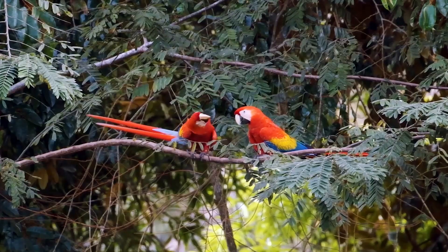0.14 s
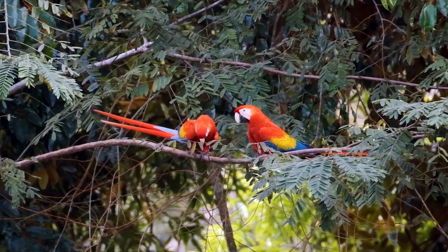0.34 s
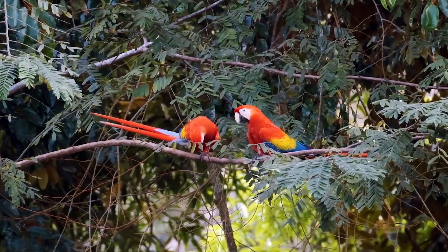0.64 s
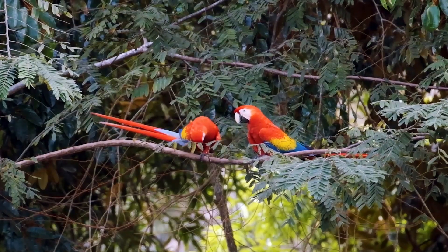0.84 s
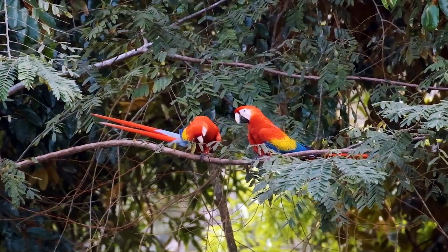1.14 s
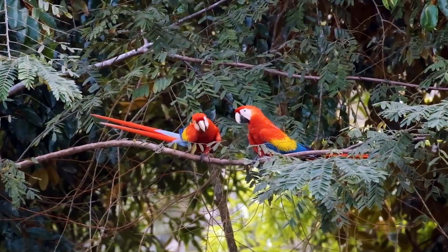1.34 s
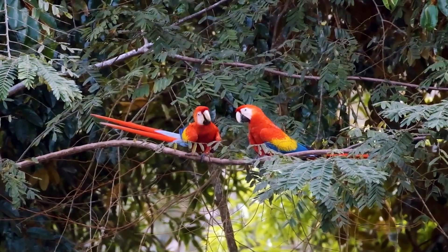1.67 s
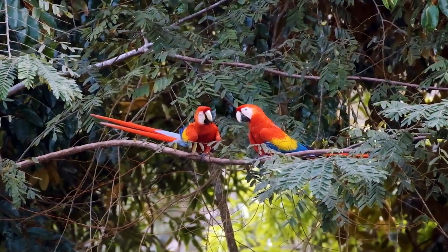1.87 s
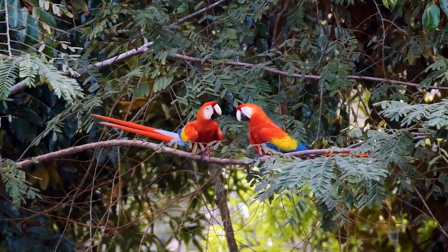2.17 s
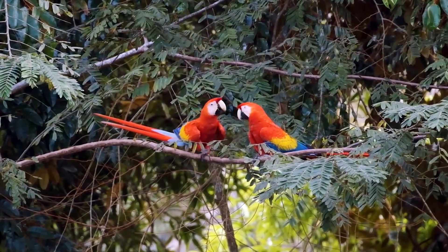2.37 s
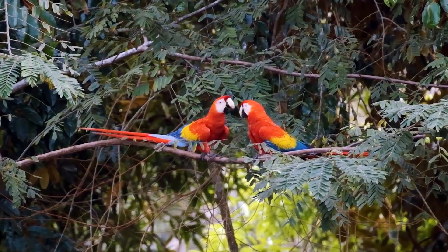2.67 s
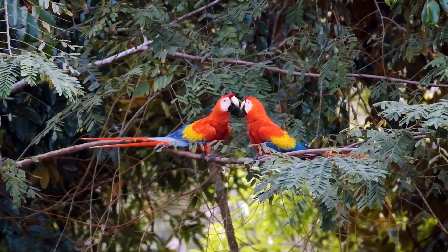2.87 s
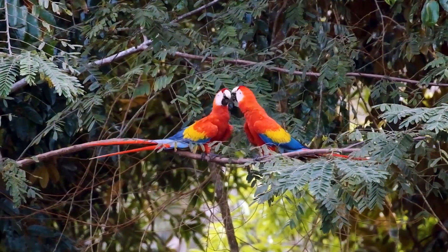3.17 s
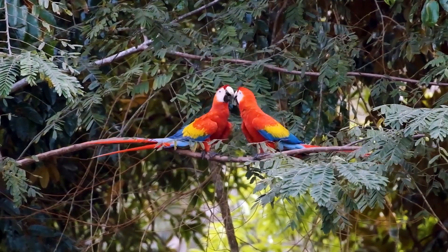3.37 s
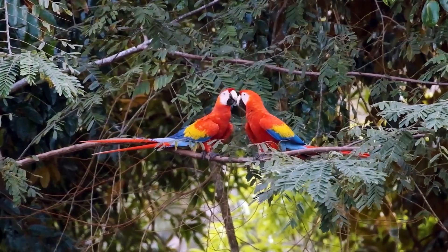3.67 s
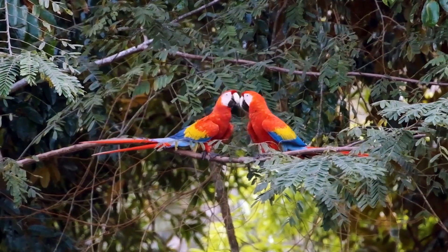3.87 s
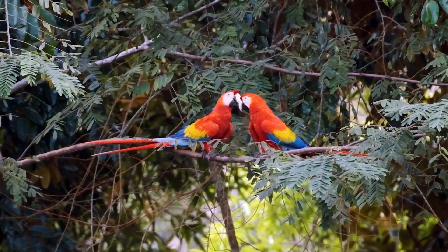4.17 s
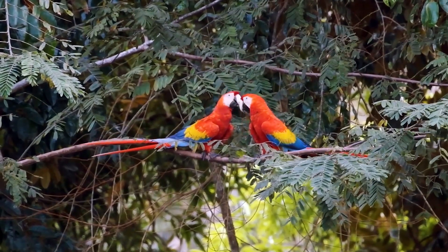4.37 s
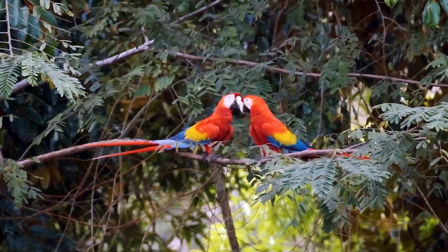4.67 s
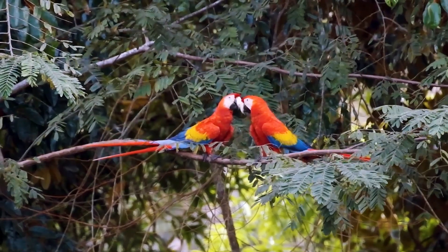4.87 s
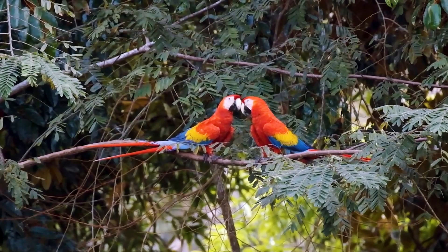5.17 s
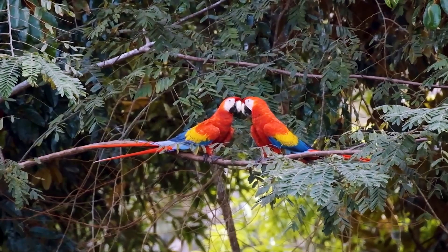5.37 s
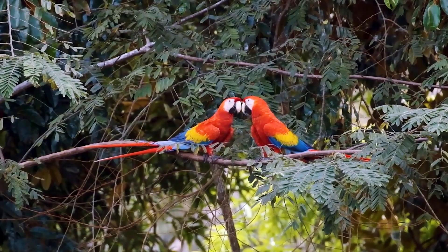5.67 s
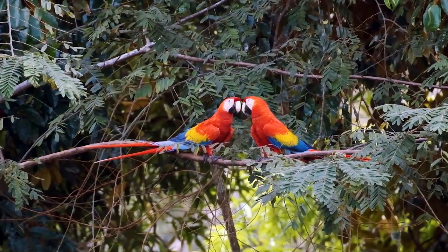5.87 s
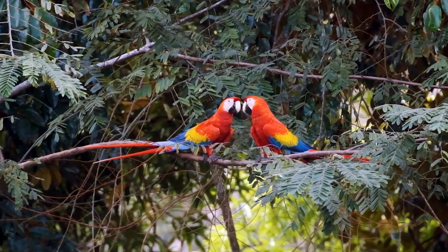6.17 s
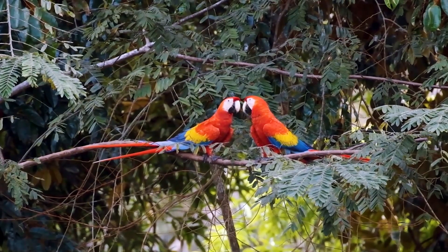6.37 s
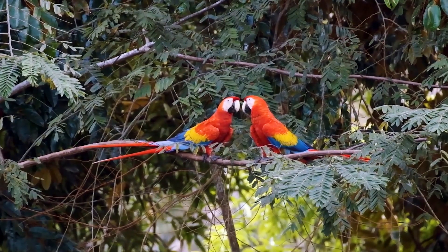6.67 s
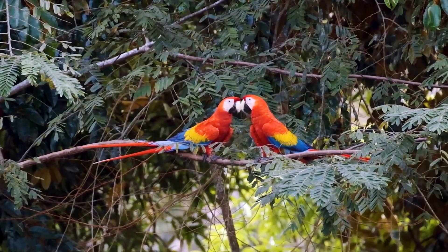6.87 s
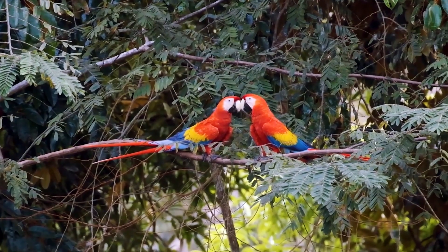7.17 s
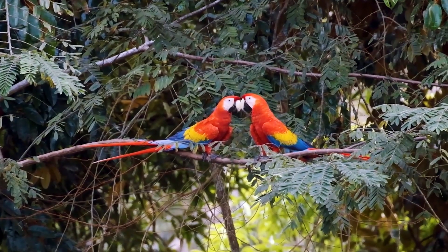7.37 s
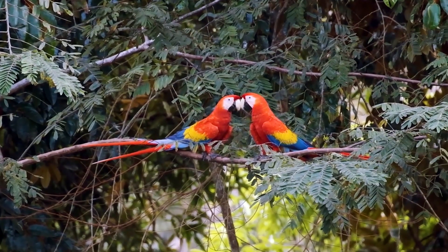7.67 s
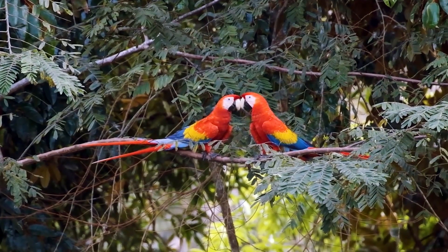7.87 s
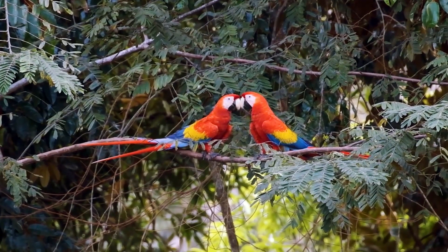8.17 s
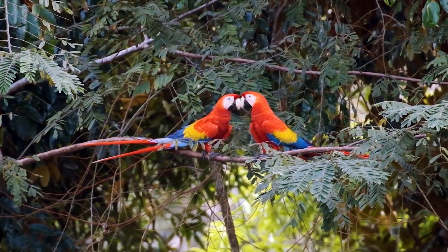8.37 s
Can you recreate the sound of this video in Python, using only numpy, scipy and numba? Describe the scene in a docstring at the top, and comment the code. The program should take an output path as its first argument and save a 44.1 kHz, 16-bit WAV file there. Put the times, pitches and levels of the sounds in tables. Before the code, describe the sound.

Two macaws on a rainforest branch: one loud, harsh, drawn-out squawk at once, then small throaty clucks and a throbbing growl. Softer, shorter calls follow, slipping between rasp and clear falling notes. A chatter phrase is heard twice in a row. Short diffuse echo from the trees, faint crickets, cicadas and thin far whistles, low steady air. Birds heard at moderate distance, outdoors, in mono.

```python
"""Macaws call in rainforest: a long harsh squawk, a throbbing growl, then softer chatter that slips between
rasp and clear gliding notes, with small clucks between. The calls mix steady pulses and uneven snaps
sent through resonances of chest, throat, beak and head; each cluck is a short puff of the same rasp.
The trunks throw back a short echo. Filtered noise makes one brief rustle, a low thump and low rough undertones
of the chatter. Crickets and cicadas trill as ringing pulses, thin whistles are pure tones, and the air is
shaped noise. One stretch of sound is heard twice in a row."""
import sys
import numpy as np
from scipy import signal
from scipy.fft import rfft, irfft, next_fast_len
from scipy.io import wavfile
from scipy.ndimage import uniform_filter1d
from numba import njit

SR = 44100
rng = np.random.default_rng(int(sys.argv[2]) if len(sys.argv) > 2 else 0)


def wav_record(signal):
    """Record a signal, one row per channel, as 16-bit PCM in the file named by sys.argv[1]."""
    frames = np.transpose(np.atleast_2d(signal))
    bounded = np.clip(frames, -1, 1)
    # unit amplitude maps onto the largest positive 16-bit level
    quanta = np.round(bounded * 32767).astype(np.int16)
    wavfile.write(sys.argv[1], SR, quanta)


N = 376172
TIME = np.arange(N) / SR   # seconds

# How hard the bird calls: one list for each call or part of a call, in order of time.
# Each clear gliding note has two swells, each with its own list.
# Each row: time in seconds, level in dB before the throbs are added.
EFFORT = [
    [(.012, -36.5), (.058, -26.5), (.116, -24), (.165, -26.5), (.197, -33.5), (.215, -28), (.258, -27.5),
     (.281, -31.5), (.297, -25), (.372, -25), (.385, -28), (.42, -30), (.552, -36), (.6, -61)],
    [(2.585, -45), (2.607, -41.5), (2.657, -42.5), (2.705, -40), (2.935, -39.5), (2.99, -56.5)],
    [(2.995, -46), (3.012, -50), (3.021, -38), (3.04, -42), (3.07, -56)],
    [(3.59, -45), (3.66, -39), (3.686, -39), (3.722, -38), (3.79, -60)],
    [(3.965, -51.5), (3.987, -35.5), (4.005, -39.5), (4.03, -40.5)],
    [(4.035, -41), (4.058, -41), (4.074, -34), (4.105, -44)],
    [(4.11, -53.5), (4.15, -52), (4.162, -41), (4.236, -36.5), (4.298, -49), (4.33, -58)],
    [(5.294, -49), (5.306, -47), (5.318, -37), (5.399, -36.5), (5.455, -35), (5.53, -54.5)],
    [(5.535, -51.5), (5.615, -52.5), (5.63, -45), (5.695, -44.5), (5.725, -43)],
    [(5.73, -43), (5.745, -40), (5.756, -31.5), (5.768, -38), (5.785, -41)],
    [(5.79, -42.5), (5.838, -36.5), (5.855, -39.5)],
    [(5.86, -45), (5.87, -38), (5.9, -58)],
    [(8.379, -48), (8.42, -45), (8.428, -38), (8.476, -39), (8.488, -47), (8.497, -40.5), (8.508, -40.5),
     (8.516, -52), (8.523, -40), (8.53, -40)],
]


def amp(db):
    """Turn decibels into a gain."""
    return 10 ** (np.asarray(db) / 20)


def rms_one(x):
    """Scale to an rms (average strength) of one."""
    return x / np.sqrt(np.mean(x ** 2) + 1e-20)


def even(x):
    """Even out loud and soft moments by dividing by the running rms."""
    size = int(0.071 * SR)
    power = uniform_filter1d(uniform_filter1d(x ** 2, size), size)
    return x / np.sqrt(power + 1e-12)


def in_time(tables):
    """Join tables of rows, time first, into one curve per remaining column."""
    s, *columns = np.transpose([row for table in tables for row in table])
    return [np.interp(TIME, s, c) for c in columns]


def drift(rate_hz):
    """Random wandering of spread one: noise at every 8th sample, smoothed twice; higher rates wander faster."""
    r = np.exp(-2 * np.pi * rate_hz * 8 / SR)
    noise = rng.standard_normal(N // 8 + 2002)
    slow = signal.lfilter([1], [1, -2 * r, r * r], noise)[2000:]   # skip the filter's start
    return np.interp(np.arange(N) / 8, np.arange(len(slow)), rms_one(slow))


def bout(start, end, fade):
    """One between start and end, with a fade inside each edge; all in seconds."""
    return np.interp(TIME, [start, start + fade, end - fade, end], [0, 1, 1, 0])


def band(x, low_hz, high_hz):
    """Keep mainly the frequencies between two limits."""
    return signal.sosfilt(signal.butter(2, [low_hz, high_hz], "band", fs=SR, output="sos"), x)


@njit
def moving(x, cosine, radius):
    """Two-pole resonance whose centre and width can change at every sample."""
    y = np.zeros(len(x))
    for i in range(2, len(x)):
        r = radius[i]
        y[i] = (1 - r * r) / 2 * (x[i] - x[i - 2]) + 2 * r * cosine[i] * y[i - 1] - r * r * y[i - 2]
    return y


def resonate(x, hz, width_hz):
    """Resonance with gain one at its centre; centre and width may be numbers or curves."""
    cosine = np.cos(2 * np.pi * hz / SR) * np.ones(len(x))
    radius = np.exp(-np.pi * width_hz / SR) * np.ones(len(x))
    return moving(x, cosine, radius)


def twice(x, hz, width_hz):
    """A resonance inside a wider one: steep sides, with little sound left between peaks."""
    return resonate(resonate(x, hz, 2.07 * width_hz), hz, width_hz)


def syrinx_pitch():
    """Pitch of the bird's voice organ; clear notes scoop up, slide down in an S and keep sagging."""
    # Pitch of the rasping calls. Each row: time in seconds, pitch in Hz.
    rasping = [
        [(.6, 477)],
        [(2.5, 621.6), (3.1, 621.7)],
        [(3.62, 703), (3.648, 732), (3.69, 705), (3.7, 591), (3.73, 561.5)],
        [(4.2, 597.5)],
        [(5.29, 440), (5.32, 561.6), (5.386, 595.6), (5.476, 531.3), (5.53, 375)],
        [(5.545, 560.9), (5.62, 579.9), (5.684, 628), (5.72, 589)],
        [(8.42, 713.6), (8.492, 704), (8.518, 767)],
    ]
    # Clear sliding notes. Each row: start, middle of the slide and end in seconds, first pitch,
    # high pitch and low pitch in Hz, slide time in seconds.
    glides = [(3.962, 4.006, 4.1, 500.6, 865.1, 632, .014), (5.73, 5.773, 5.865, 847, 864.7, 665.6, .009)]
    scoop_s, sag_hz_per_s = .006, 300
    pitch, = in_time(rasping)
    for start, middle, end, first_hz, high_hz, low_hz, slide in glides:
        fall = (1 - np.tanh((TIME - middle) / (2 * slide))) / 2
        note = low_hz + (high_hz - low_hz) * fall - sag_hz_per_s * (TIME - middle)
        note -= (high_hz - first_hz) * np.exp(-np.abs(TIME - start) / scoop_s)
        pitch = np.where((TIME > start) & (TIME < end), note, pitch)
    return pitch


def syrinx(pitch):
    """The voice organ gives steady pulses on the pitch, and chaotic snaps of uneven size and spacing."""
    clear_share = .7   # strength of the steady pulses beside the rasp
    phase = 2 * np.pi * np.cumsum(pitch * (1 + 0.0054 * drift(71))) / SR
    clear = sum(np.cos(k * phase) for k in range(1, 15))
    cycles = np.floor(np.cumsum(pitch * amp(5.0 * drift(500))) / SR)
    snaps = np.diff(cycles, prepend=0)   # one snap as each uneven cycle begins
    snaps *= amp(1.57 * np.clip(rng.standard_normal(N), -2, 2))
    snaps *= np.where(rng.random(N) < .25, -1, 1)   # some snap the other way
    breath = .4 * rng.standard_normal(N)
    flutter = amp(1.6 * np.clip(drift(90), -2, 2))
    rasp = (rms_one(snaps) + breath) * flutter
    return clear_share * rms_one(clear), rms_one(rasp)


def roughness():
    """How irregular the vibration is: one is pure rasp, and the steadier spells lie lower."""
    # Spells of steadier vibration. Each row: start and end in seconds, roughness from 0 to 1.
    steady = [(3.635, 3.675, .42), (3.675, 3.7, .9), (3.7, 3.755, .3), (3.755, 3.8, .7), (3.95, 4.087, .03),
              (4.17, 4.3, .88), (5.28, 5.34, .16), (5.34, 5.445, .86), (5.445, 5.54, .4), (5.54, 5.67, .92),
              (5.67, 5.735, .8), (5.735, 5.848, .03), (8.42, 8.6, .8)]
    change_s = .012
    rough = 1 - sum((1 - r) * ((TIME >= start) & (TIME < end)) for start, end, r in steady)
    return np.clip(uniform_filter1d(rough, int(change_s * SR)), 0, 1)


def call_colour(move_s):
    """Peak level and colour for each list of EFFORT, reached move_s seconds after its start and held to its end."""
    # How throat, beak and chest colour the voice: one row for each call or part of a call, as in EFFORT.
    # Each row: first throat resonance in Hz, its width in Hz, second resonance in Hz, its level in dB,
    # third in Hz, its level in dB, beak in Hz, its level in dB, chest level in dB, low throat level in dB.
    # Levels are relative to the effort, before its movements.
    colours = [(1567, 540, 2720, -1.5, 3730, -5.5, 5030, -16, -25, -8.5),
               (1418, 238, 2496, -4.5, 3530, -7.5, 5560, -19.5, -18.5, -17.5),
               (1640, 270, 2450, 0.5, 3500, -10, 5700, -17, -13.5, -6.5),
               (1500, 450, 2400, -5, 4500, -33, 5300, -18, -11.5, -17),
               (1610, 350, 1980, -15, 3930, -23, 4700, -17, -30, -15),
               (1480, 410, 2580, 1, 4100, -37, 4900, -22.5, -16.5, -18),
               (1450, 320, 2310, -3, 3920, -15.5, 5110, -12.5, -11, -16),
               (1393, 425, 2320, -21, 4030, -24.5, 4870, -25.5, -10, -15),
               (1361, 430, 2320, -11, 3940, -20, 5170, -18.5, -2.5, -9.5),
               (1589.5, 230, 2200, -23, 3800, -15.5, 4703, -18.5, -20, -20.5),
               (1496, 750, 2460, 3.5, 3870, -13, 4980, -17.5, -17.5, -21.5),
               (1750, 290, 2990, 3, 3900, -19.5, 5120, -35, -8.5, -6),
               (1466, 280, 2087, -5, 3100, -15.5, 5130, -23, -12.5, -21)]
    parts = []
    for effort, row in zip(EFFORT, colours):
        start, end = effort[0][0], effort[-1][0]
        top_db = max(db for _, db in effort)
        parts.append([(s, top_db, *row) for s in (min(start + move_s, end), end)])
    return in_time(parts)


def throb_swell():
    """Swell of the growl in dB: each throb rises and falls as a bell shape, quicker on the way up."""
    # Throbs of the growl. Each row: time of the peak in seconds, swell in dB, length of the fall in seconds.
    throbs = [(2.611, 10.5, 0.0087), (2.646, 12, 0.015), (2.682, 10, .005), (2.713, 15, .008),
              (2.75, 12.5, 0.0093), (2.785, 15.5, .007), (2.818, 15, .012), (2.853, 13.5, .007),
              (2.89, 16.5, 0.0083), (2.929, 11.5, .013), (2.961, 15.5, 0.0077)]
    rise = 0.73   # rise time over fall time
    swell_db = 0
    for s, db, length in throbs:
        side = np.where(TIME < s, rise * length, length)
        swell_db = swell_db + db * np.exp(-.5 * ((TIME - s) / side) ** 2)
    return swell_db


def macaw_calls(pitch, clear, rasp):
    """The voice organ sounds through moving resonances of chest, throat and beak, and fixed ones of the head."""
    # Throat movement in the long squawk; the last row joined on below holds for later calls.
    # Each row: time in seconds, first resonance multiplied by, second resonance multiplied by,
    # second resonance gain in dB, treble gain in dB.
    squawk = [(.012, 0.99, 1, -3, 1.5), (.058, 1.02, 1.01, -0.5, 2), (.116, 1.08, 0.99, -6, -3),
              (.19, 1.06, 1.09, 1, 2), (.258, .88, 0.93, -1, -3), (.32, 0.9, .85, 1.5, -2),
              (.376, 1.06, 0.955, 4, -5.5), (.42, 1.03, 1.035, 1, -6), (.552, 1.01, 1.155, 3, -19),
              (.6, .99, 1.2, 12, -16)]
    # Head resonances that stay put. Each row: centre in Hz, width in Hz, level in dB relative to the beak.
    head_resonances = [(6620, 890, -8), (8080, 1300, -14.5), (9840, 900, -25), (12500, 2200, -23.5)]
    throat_move_s = 0.038   # time the second resonance takes to reach its place
    opening_db, opening_s = 4, 0.029   # each list of EFFORT begins brighter
    chest_lag, third_lag = 0.53, 0.13   # share of a drop in effort that each does not follow
    third_treble = 0.52   # share of the treble change that reaches the third resonance
    throb_second, throb_treble = 0.67, 0.33   # share of the throbs, in dB, in the upper resonances

    level_db, = in_time(EFFORT)
    top_db, first_hz, width_hz, _, _, third_hz, third_db, beak_hz, beak_db, chest_db, low_db = call_colour(0)
    second_hz, second_db = call_colour(throat_move_s)[3:5]
    shift, second_shift, gained_db, treble_db = in_time([squawk, [(1, 0.99, 1, 0.0046, 0.01)]])
    for part in EFFORT:
        start = part[0][0]
        treble_db += opening_db * (TIME > start - .01) * np.exp(-np.abs(TIME - start) / opening_s)
    drop_db = top_db - level_db

    rough = roughness()
    source = np.sqrt(1 - rough) * clear + np.sqrt(rough) * rasp
    hoarse = np.clip(3 * rough, 0, 1)   # irregularity blurs the high partials first
    upper = np.sqrt(1 - hoarse) * clear + np.sqrt(hoarse) * rasp
    deep = np.sqrt(1 - rough ** 2) * clear + rough * rasp   # and the lowest last

    first = even(band(twice(source, shift * first_hz, width_hz), 630, 7300))
    first = first - amp(low_db) * even(twice(upper, 1067, 250))   # the low throat
    second = even(twice(source, second_shift * second_hz, 394))
    second = amp(second_db + gained_db) * second
    chest = even(band(twice(deep, pitch, 470), 320, 2500))
    chest = amp(chest_db + chest_lag * drop_db) * chest
    third = twice(upper, np.sqrt(shift) * third_hz, 470)
    third = even(third - amp(-10.5) * twice(upper, 4365, 470))
    third = amp(third_db + third_lag * drop_db + third_treble * treble_db) * third
    head = 0
    for k, (hz, w, db) in enumerate(head_resonances):
        head = head + (-1) ** k * amp(db) * rms_one(twice(rasp, hz, w))
    beak = head * np.sqrt(hoarse) - even(twice(upper, beak_hz, 420))
    beak = amp(beak_db + treble_db) * beak

    swell_db = throb_swell()
    voice = amp(swell_db) * (first - chest)
    voice = voice - amp(throb_second * swell_db) * second
    voice = voice + amp(throb_treble * swell_db) * (third + beak)
    sounding = sum(bout(t[0][0] - .004, t[-1][0] + 0.0045, 0.0042) for t in EFFORT)
    return np.minimum(sounding, 1) * amp(level_db) * voice


def clucks(rasp):
    """Short puffs of rasp ring two throat resonances and a low chest."""
    # Each row: start in seconds, rough peak level in dB, throat resonance in Hz, second resonance in Hz,
    # its level in dB relative to the throat, length in seconds (at least 0.004 is used).
    cluck_rows = [(1.258, -43, 1110, 2550, -9, 0.018), (1.42, -46, 940, 3350, -25, 0.023),
                  (1.693, -44.5, 1360, 2500, -17, 0.018), (1.764, -35.5, 1110, 2620, -10.5, 0.042),
                  (1.811, -42, 1030, 2650, -18, 0.037), (1.846, -48, 1140, 2390, -26, 0.11),
                  (2.283, -45, 1370, 2210, -25, 0.013), (2.323, -39, 1270, 3130, -17, 0.012),
                  (2.341, -41, 1430, 3080, -20, 0.0044), (2.431, -31.5, 1360, 3260, -8.5, 0.031),
                  (2.466, -28.5, 1300, 3370, -8.5, 0.035), (2.516, -30.5, 1440, 3080, -14, 0.012),
                  (3.55, -37, 1600, 2130, -21, 0.024), (3.881, -40, 1330, 2370, -8, 0.038),
                  (4.888, -48, 1255, 3155, -19, 0.026), (4.922, -47, 1250, 2230, -13, 0.0079),
                  (4.949, -43.5, 1250, 2230, -16, 0.022), (4.98, -39.5, 1248, 2738, -24, 0.014),
                  (5.0, -40, 1200, 2740, -24, 0.008), (5.214, -39.5, 1100, 2465, -3, 0.008),
                  (5.229, -44, 1500, 2470, -8, 0.008), (8.337, -49, 1466, 2866, -15, 0.026),
                  (8.353, -49, 1340, 2180, -23, 0.023)]
    crest_db = 12   # how far the peak is taken to stand above the rms
    out = np.zeros(N)
    t = TIME[:SR // 10]
    for s, db, hz, second_hz, second_db, length in cluck_rows:
        start, length = round(s * SR), max(length, .004)
        puff = rasp[start:start + len(t)] * np.minimum(t / 0.001, 1) * np.exp(-(t / length) ** 2)
        sound = rms_one(twice(puff, hz, 376))
        sound -= amp(second_db) * rms_one(twice(puff, second_hz, 420))
        sound -= amp(-15.5) * rms_one(twice(puff, 350, 390))   # the chest adds a low body
        # The rms was taken over 0.1 s, so shorter puffs are scaled down.
        out[start:start + len(t)] += amp(db - crest_db) * sound * np.sqrt(10 * length)
    return out


def forest_echo(x):
    """Scattered returns from trunks and moving leaves, which smear steady notes."""
    echo_db, t60_s, low_hz, high_hz = -18.5, 0.81, 736, 4440   # t60: time to fall by 60 dB
    t = TIME[:SR]
    returns = band(rng.standard_normal(SR), low_hz, high_hz)
    returns *= amp(-60 * t / t60_s) * np.minimum(t / 0.0024, 1)
    returns /= np.sqrt(np.sum(returns ** 2))
    smeared = x * (.5 + 0.74 * drift(36))
    return amp(echo_db) * signal.fftconvolve(smeared, returns)[:N]


def rustle_thump_and_undertones():
    """One brief rustle, a low thump, and low rough undertones of the chatter, made from filtered noise."""
    # Each row: start in seconds, level in dB before it wavers and fades, fading time in seconds,
    # lowest frequency in Hz, highest frequency in Hz.
    noise_rows = [(6.29, -52.5, 0.023, 350, 5900), (3.68, -45.5, 0.043, 190, 490),
                  (3.69, -57, .03, 60, 110), (4.16, -58.5, 0.13, 205, 257), (5.5, -56.5, 0.066, 202, 312)]
    out = np.zeros(N)
    for s, db, length, low_hz, high_hz in noise_rows:
        shape = np.exp(-np.maximum(TIME - s, 0) / length) * np.clip((TIME - s) / 0.0082, 0, 1)
        noise = rms_one(band(rng.standard_normal(N), low_hz, high_hz))
        out += amp(db + 3.9 * drift(80)) * shape * noise
    return out


def trill(hz, width_hz, per_s, noisy):
    """Strokes at a nearly steady rate ring a narrow resonance; noisy sets the noise beside the tone."""
    beat = np.cos(2 * np.pi * np.cumsum(per_s * (1 + 0.0093 * drift(2.94))) / SR)
    stroke = np.maximum(beat, 0) ** 2
    tone = np.cos(2 * np.pi * np.cumsum(hz * (1 + .003 * drift(1.5))) / SR)
    carrier = tone + noisy * rng.standard_normal(N)
    return rms_one(resonate(resonate(stroke * carrier, hz, width_hz), hz, width_hz))


def crickets():
    """A near cricket trills in bouts by its wing strokes; a fainter, faster one goes on throughout."""
    # Bouts of the near cricket. Each row: start and end in seconds, level in dB.
    bouts = [(.3, .75, -80), (0.848, 1.272, -71), (1.39, 1.776, -71), (1.758, 2.1, -78), (2.546, 3.2, -79),
             (3.48, 4.08, -82), (4.35, 4.549, -85), (4.6, 5.027, -80), (5.52, 6.2, -79.5),
             (8.197, 8.532, -77)]
    near = sum(amp(db) * bout(start, end, 0.029) for start, end, db in bouts)
    faint = amp(-84.5 + 1.8 * drift(1.5))
    return near * trill(9800, 250, 52.5, noisy=2.8) + faint * trill(10100, 200, 104, noisy=6.0)


def cicadas():
    """Two cicadas buzz in bouts, one a little higher, as fast strokes on a resonance."""
    # Each row: start and end in seconds, level of the lower one in dB, level of the upper one in dB.
    # Both levels then waver a little.
    bouts = [(.5, 1.1, -79, -76.5), (1.097, 1.697, -80, -78), (1.748, 3.5, -76, -75), (3.5, 4.86, -76, -81),
             (4.817, 6.43, -71.5, -76.5), (8.003, 8.35, -77, -75)]
    lower, upper = sum(amp([[low_db], [up_db]]) * bout(start, end, 0.044)
                       for start, end, low_db, up_db in bouts)
    out = lower * amp(0.84 * drift(2.5)) * trill(6910, 500, 170, noisy=1.7)
    return out + upper * amp(1.6 * drift(2.6)) * trill(7230, 300, 180, noisy=4.5)


def insect_chorus():
    """A far chorus blurs into noise around one resonance and slowly grows."""
    level_db, grows_db_per_s = -71, .3   # the level is the one at 4 s, before it wavers
    level = amp(level_db + grows_db_per_s * (TIME - 4) + 0.87 * drift(2))
    return level * rms_one(twice(rng.standard_normal(N), 3010, 310))


def whistles():
    """Thin far whistles: pure tones that fade in and out and waver in level."""
    # Each row: start and end in seconds, pitch in Hz, peak level in dB before it wavers.
    whistle_rows = [(.85, 1.505, 4690, -68.5), (0.954, 1.718, 5230, -67.5), (1.2, 1.58, 5700, -70),
                    (4.3, 4.58, 6100, -71)]
    out = np.zeros(N)
    for start, end, hz, db in whistle_rows:
        out += bout(start, end, 0.14) * amp(db + 1.6 * drift(13)) * np.sin(2 * np.pi * hz * TIME)
    return out


def air():
    """Steady hiss and rumble: noise with each frequency turned up or down."""
    # Balance of the noise. Each row: frequency in Hz, strength in dB relative to the other rows.
    balance = np.array([(15, -27), (25, 4), (113, -5), (433, 2), (666, -6), (1030, -4), (2630, -11.5),
                        (3010, -9.5), (3830, -13), (6930, -16), (8830, -21), (9830, -20), (10700, -27.5),
                        (15500, -23.5)])
    level_db = -58.5
    size = next_fast_len(N)
    hz = np.maximum(np.arange(size // 2 + 1) * SR / size, 10)
    gain = amp(np.interp(np.log(hz), np.log(balance[:, 0]), balance[:, 1]))
    noise = irfft(rfft(rng.standard_normal(size)) * gain, size)[:N]
    return amp(level_db + 0.093 * drift(1.8)) * rms_one(noise)


def scene():
    """Birds with their echo over low noises, a rustle, insects, whistles and air."""
    pitch = syrinx_pitch()
    clear, rasp = syrinx(pitch)
    birds = macaw_calls(pitch, clear, rasp) + clucks(rasp)
    insects = crickets() + cicadas() + insect_chorus()
    small_noises = rustle_thump_and_undertones()
    return (birds + forest_echo(birds) + small_noises + insects + whistles() + air())[None]


def record(dry):
    """One stretch plays again right after itself, in place of what was there; the top is cut."""
    repeat_from_s, repeat_length_s = 4.83, 1.6
    start, length = round(repeat_from_s * SR), round(repeat_length_s * SR)
    repeated = dry.copy()
    repeated[:, start + length:start + 2 * length] = dry[:, start:start + length]
    top_cut = signal.cheby2(12, 60, 16000, fs=SR, output="sos")   # 60 dB down from 16 kHz up
    return signal.sosfilt(top_cut, repeated)


dry = scene()
out = record(dry)
wav_record(out)
```